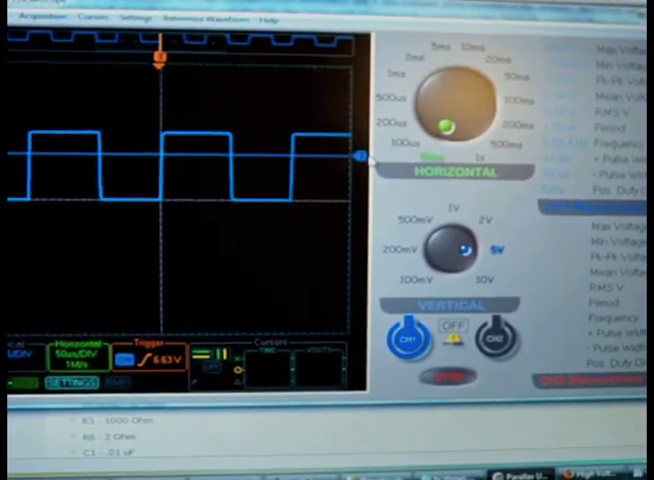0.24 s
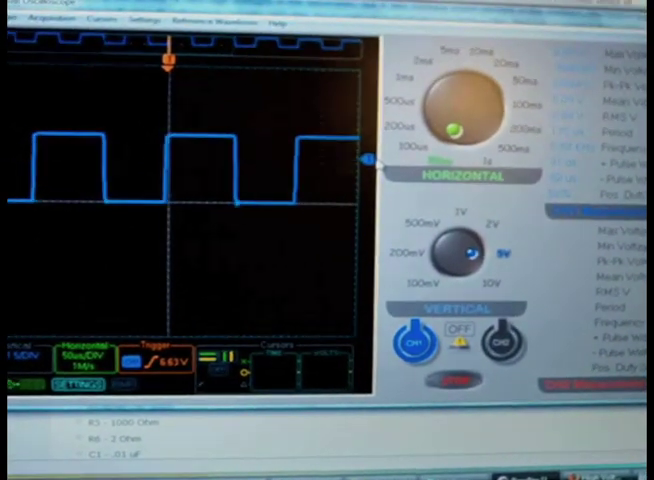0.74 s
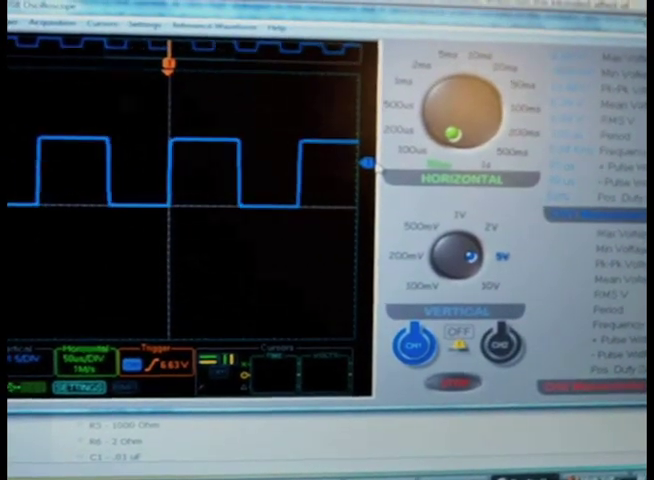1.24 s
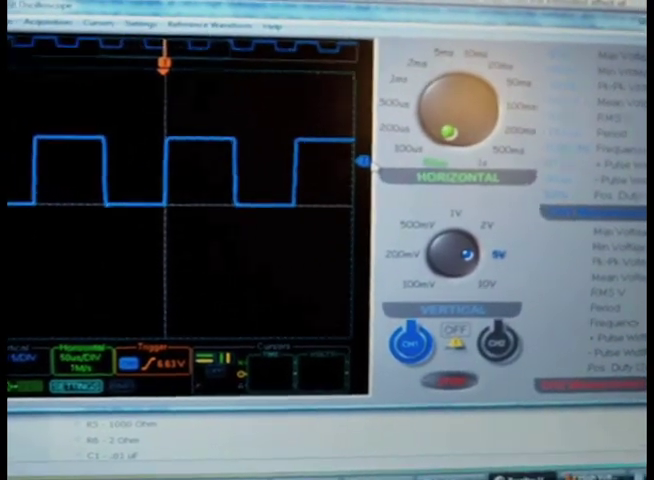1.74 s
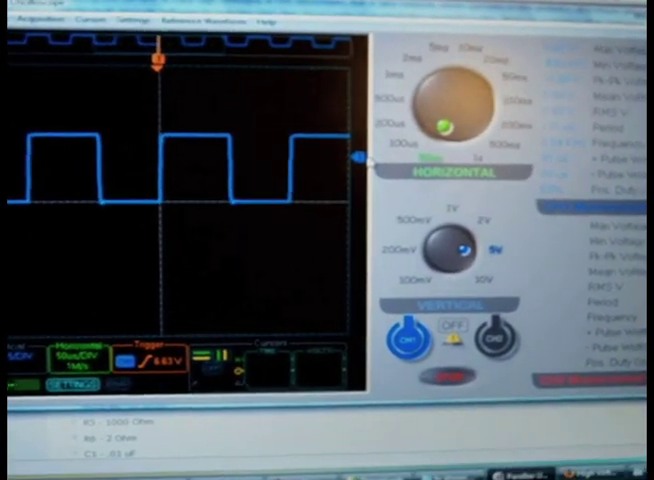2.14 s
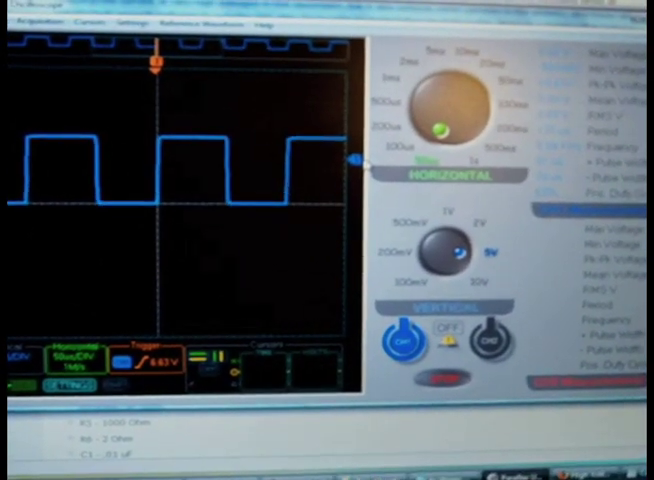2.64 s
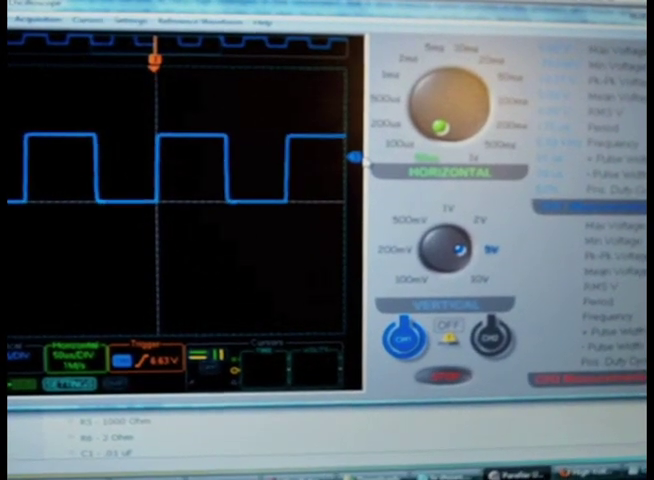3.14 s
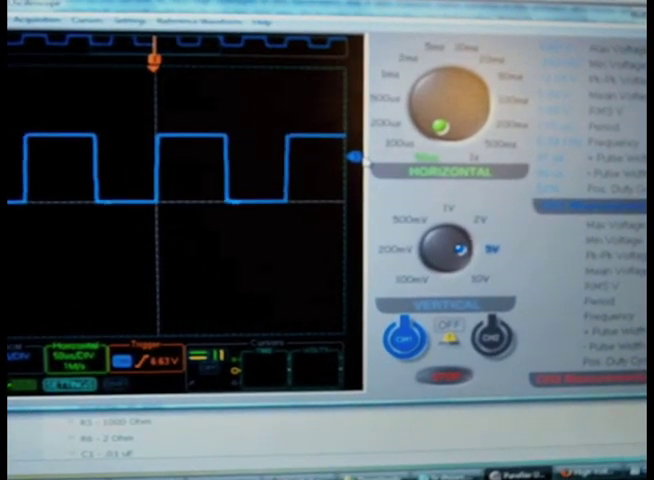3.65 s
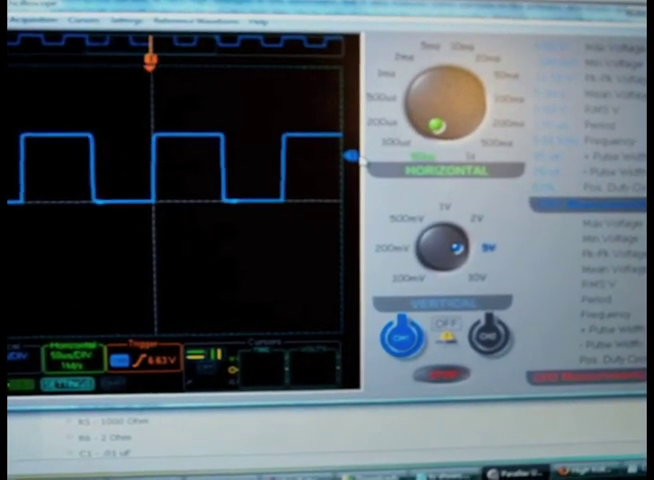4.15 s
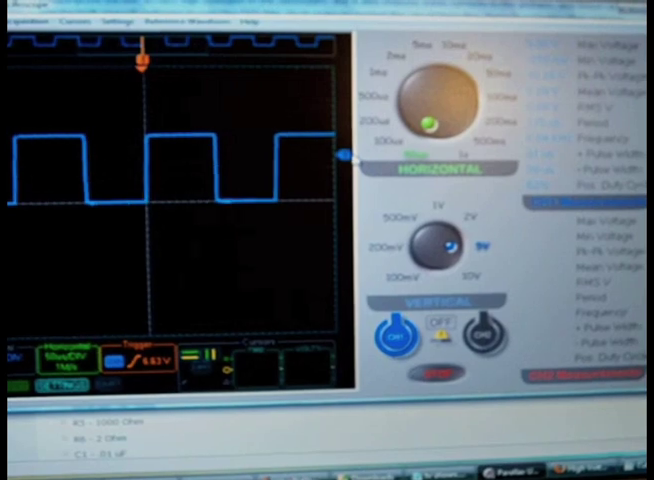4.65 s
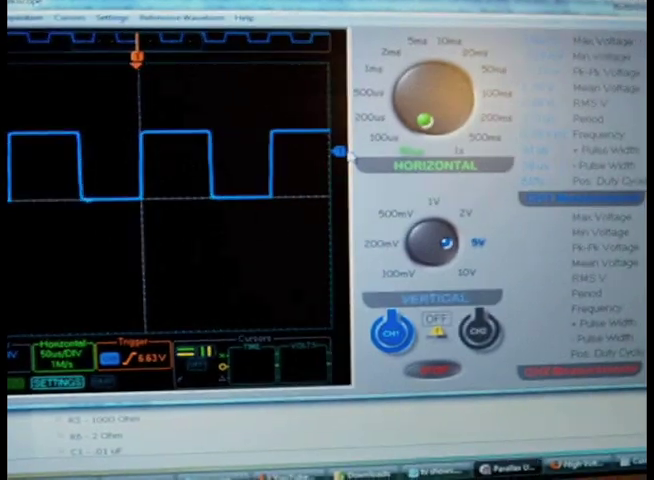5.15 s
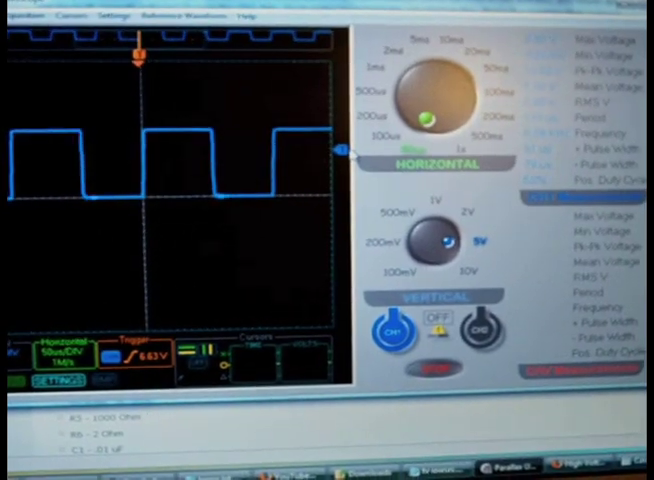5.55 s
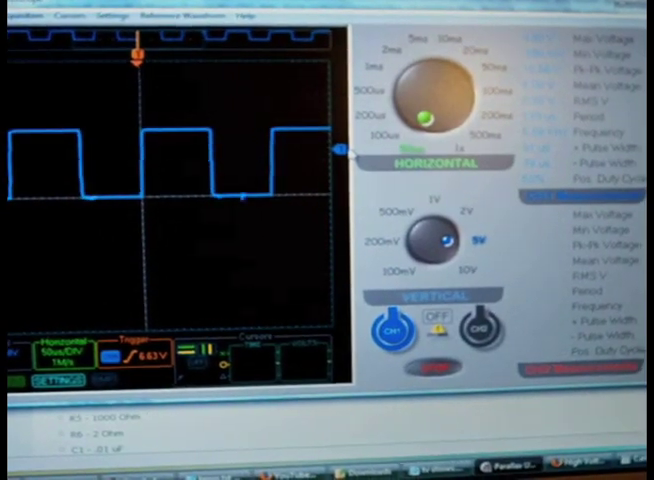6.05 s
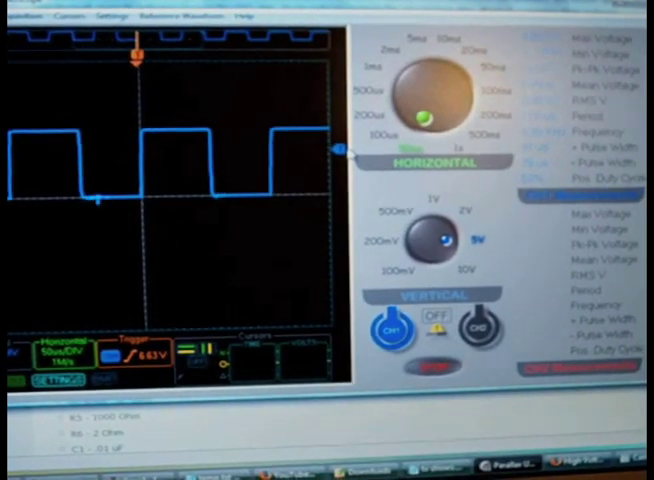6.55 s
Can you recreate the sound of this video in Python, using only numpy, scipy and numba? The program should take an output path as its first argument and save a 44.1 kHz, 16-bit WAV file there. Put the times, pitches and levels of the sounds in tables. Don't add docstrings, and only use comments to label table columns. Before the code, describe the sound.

In a small workshop, a high-voltage circuit sings with a thin, very high whine over mains hum, fans and low rumble. Brief faint spark catches and dull wooden taps come first, then a growing raspy arc that breaks off, scattered rough crackles, and finally a sustained buzzing arc that shifts pitch to the end. One fairly close mono microphone, dull on top, with short room ringing.

```python
import sys
import numpy as np
from scipy import signal
from scipy.fft import rfft, irfft
from scipy.io import wavfile
from scipy.ndimage import uniform_filter1d, map_coordinates
from numba import njit

SR = 44100
rng = np.random.default_rng(int(sys.argv[2]) if len(sys.argv) > 2 else 0)


def unload_audio(sound):
    columns = np.transpose(np.atleast_2d(sound))
    steps = np.round(np.clip(columns, -1, 1) * 32767)
    wavfile.write(sys.argv[1], SR, steps.astype(np.int16))


def boost_factor(decibels):
    exponent = np.asarray(decibels, float) / 20
    return 10 ** exponent


N = 299557

DRIVER_HZ = 5875
ATTACK_S = 0.0027
# (start [s], length [s], level [dB], kind of gap)
CATCHES = [(0.39, 0.061, -52, "hiss"), (0.471, 0.049, -49.5, "hiss"), (.962, 0.018, -53.5, "hiss"),
           (1.123, .008, -43.5, "half"), (1.131, 0.0092, -40.5, "snap"), (1.141, 0.037, -48, "half"),
           (1.167, 0.035, -42.5, "third"), (1.199, 0.047, -40, "third"), (1.261, .015, -41, "half"),
           (1.267, .05, -46.5, "third"), (1.38, 0.016, -39.5, "third"), (1.399, 0.02, -43.5, "half"),
           (1.423, 0.015, -45.5, "third"), (2.137, 0.034, -42.5, "snap"), (2.284, .006, -61, "hiss"),
           (2.328, 0.0066, -41.5, "hiss"), (2.598, .015, -40, "half"), (2.62, 0.0036, -36, "third"),
           (2.623, 0.03, -43, "half"), (3.436, .04, -38.5, "open"), (3.471, 0.036, -38, "open"),
           (3.595, .03, -44, "wide"), (4.254, 0.008, -34.5, "wide"), (4.277, .07, -33.5, "wide"),
           (4.412, .035, -37.5, "wide"), (4.475, 0.049, -34, "wide"), (4.544, .11, -34, "wide"),
           (4.676, 0.27, -50, "wide"), (4.964, 0.013, -40.5, "open"), (5.117, .021, -41, "open")]


def unit(x):
    return x / np.sqrt(np.mean(x ** 2) + 1e-20)


def along(points, hz):
    f, v = np.transpose(points)
    return np.interp(np.log(hz + 1), np.log(f + 1), v)


def curve(rows, t, off=None):
    s, *cols = np.transpose(rows)
    return [np.interp(t, s, c, off, off) for c in cols]


def wobble(rate):
    knots = rng.standard_normal(int(N * rate / SR) + 4)
    return map_coordinates(knots, [np.arange(N) * rate / SR])


def coloured(x, spectrum):
    level_db = np.maximum(along(spectrum, np.fft.rfftfreq(4096, 1 / SR)), -70)
    cepstrum = irfft(np.log(boost_factor(level_db)))
    cepstrum[1:2048] *= 2
    cepstrum[2049:] = 0
    response = irfft(np.exp(rfft(cepstrum)))
    return signal.fftconvolve(x, response)[:N]


def tones(rows):
    t = np.arange(N) / SR
    total = 0
    for hz, db, wander in rows:
        level = boost_factor(db + 2.5 + wander * wobble(6))
        total = total + level * np.sin(2 * np.pi * hz * t + 0.88 * wobble(4.3))
    return total


def background():
    # (frequency [Hz], density [dB per Hz])
    fan_spectrum = [(88, -34.5), (150, -16), (244, -5), (267, -8), (367, -10.5), (433, -12.5), (952, -7),
                    (1040, -14), (1550, -5.5), (3890, -19.5), (5600, -20), (7280, -46.5), (12300, -120)]
    rumble_spectrum = [(8.8, -29), (15, -16), (26, -25.5), (48, -22), (131, -29.5), (200, -35.5),
                       (260, -59), (440, -120)]
    # (frequency [Hz], level re the first [dB], wander [dB])
    hum = [(60, 0, 1), (120, -4, 1.2), (242, -11, 1.2)]
    # (frequency [Hz], rms level [dB], wander [dB])
    fan_tones = [(985, -72, 2), (1513, -73, 1.5), (1763, -75, 2), (1856, -78, 1)]
    # (time [s], gain [dB])
    nearness = [(0, -0.5), (1.5, 0.5), (3.6, 0), (4.0, 6), (4.4, 5), (5.1, 4.5), (5.5, -2), (5.85, 6.5),
                (6.25, 6.5), (6.8, 7.5)]
    near_db, = curve(nearness, np.arange(N) / SR)
    fan_spectrum = fan_spectrum[:-2] + [(6300, -21), (7000, -31.5), (7600, -70)]
    fans = boost_factor(-60 + 0.25 * wobble(14)) * unit(coloured(rng.standard_normal(N), fan_spectrum))
    rumble = boost_factor(-64 + 1.1 * wobble(3.3)) * unit(coloured(rng.standard_normal(N), rumble_spectrum))
    equipment = boost_factor(near_db) * (boost_factor(-66) * tones(hum) + rumble)
    return equipment + boost_factor(0.95 * near_db) * (tones(fan_tones) + fans)


def groans():
    # (time [s], frequency [Hz], level [dB], half length [s])
    swells = [
        (.14, 42.5, -53, 0.081),
        (3.59, 297, -58, 0.021),
        (4.62, 330, -57.5, 0.043),
    ]
    t = np.arange(N) / SR
    return sum(boost_factor(db) * np.exp(-((t - s) / half) ** 2) * np.sin(2 * np.pi * hz * t)
               for s, hz, db, half in swells)


def taps():
    # (time [s], peak level [dB])
    knocks = [(0.335, -41), (0.652, -39), (1.3822, -36.5), (1.6999, -38), (4.988, -34.5)]
    # (frequency [Hz], density [dB per Hz])
    wood_spectrum = [(600, -25.5), (1100, 11), (1600, 4), (2500, 3.5), (3300, -17), (4500, -49)]
    x, t = np.zeros(N + SR), np.arange(2000) / SR
    for s, db in knocks:
        decay = boost_factor(db + 2 - 60 * t / 0.022)
        x[round(s * SR):][:len(t)] += decay * rng.standard_normal(len(t))
    return coloured(x[:N], wood_spectrum)


def opening(t):
    kinds = {"half": (2, .12), "third": (3, .29), "hiss": (2.5, 2), "snap": (3.5, 1.5), "open": (6.5, 2),
             "wide": (12, 2.8)}
    # (time [s], cycles per spark [cycles], scatter [cycles])
    strokes = [
        [(3.64, 8, 1.1), (3.71, 7.2, .9), (3.77, 5.1, .55), (3.86, 5.8, .6), (3.94, 6.9, .55), (4.0, 8, .45),
         (4.045, 8.4, .35), (4.07, 10, 2.2), (4.24, 12, 2.8)],
        [(5.15, 7, 2.4), (5.5, 7, 2.2), (5.6, 7.3, 1.2), (5.68, 5.6, .9), (5.75, 4.25, .42), (5.85, 4, .27),
         (5.89, 3.65, .3), (5.92, 3.1, .25)],
        [(5.92, 3.1, .27), (6.01, 3.1, .28), (6.05, 3.3, .33), (6.12, 3.15, .3), (6.17, 3.9, .4),
         (6.38, 4.9, .7), (6.53, 4, .29), (6.66, 3.3, .3), (6.8, 3.05, .26)],
    ]
    latest = np.maximum(np.searchsorted([row[0] for row in CATCHES], t + ATTACK_S) - 1, 0)
    gap = np.transpose([kinds[row[-1]] for row in CATCHES])[:, latest]
    for stroke in strokes:
        gap = np.where((t >= stroke[0][0]) & (t < stroke[-1][0]), curve(stroke, t), gap)
    return gap


def sparking(t):
    # (time [s], level [dB])
    drawn = [
        [(3.642, -51.5), (3.65, -39.5), (3.85, -33.5), (4.03, -30), (4.041, -39.5), (4.16, -32), (4.19, -48),
         (4.23, -59)],
        [(5.148, -50), (5.158, -37), (5.19, -40.5), (5.6, -36.5), (5.73, -31), (5.86, -32.5), (5.97, -33.5),
         (6.1, -31), (6.8, -32.5)],
    ]
    sag_db_per_s, release_s = 33, 0.022
    shapes = []
    for s, lit, db, _ in CATCHES:
        end_db = db - sag_db_per_s * lit
        shapes.append([(s - ATTACK_S, db - 30.5), (s, db),
                       (s + lit, end_db), (s + lit + release_s, end_db - 39.5)])
    return boost_factor(np.max([curve(shape, t, -200)[0] for shape in shapes + drawn], axis=0))


def whine():
    # (time [s], level [dB])
    singing = [(0, -42.5), (.3, -43), (.7, -42), (.9, -42.5), (1.1, -47.5), (1.3, -41.5), (1.5, -43.5),
               (1.7, -36.5), (1.9, -36.5), (2.05, -43.5), (2.55, -39.5), (3.1, -42.5), (3.46, -39.5),
               (3.7, -44.5), (4.0, -36.5), (4.95, -36), (5.2, -50.5), (6.79, -36)]
    # (time [s], depth [dB], t60 [s])
    stutters = [(.215, -56, .5), (.44, -54, .3), (.79, -56, .5), (1.26, -54, .3), (2.5, -62, .5),
                (2.8, -64, .3)]
    # (time [s], change [dB], half length [s])
    shadows = [(.265, -23, 0.016), (0.444, 7, 0.012), (.52, -27, 0.013), (.69, 3.5, 0.037),
               (.855, -7.5, 0.073), (0.91, 5, .04), (1.18, -7.5, 0.029), (1.24, -27, .012),
               (1.281, 7, 0.019), (1.45, -9, 0.022), (1.58, -9, 0.033), (2.1, 4, .04), (2.23, -10.5, 0.074),
               (2.38, -21, 0.076), (4.07, -21, 0.056), (4.18, -14.5, 0.035), (4.57, -11, .06),
               (4.72, -5.5, 0.3), (5.45, -12, 0.057), (5.575, 10, .015), (5.64, -15, 0.033),
               (5.71, 14, .015), (5.9, 12.5, 0.055), (6.12, 16.5, 0.0088), (6.18, -10, 0.013),
               (6.63, -14.5, 0.075)]
    flutter_spectrum = [(30, -8.5), (110, -9.5), (200, -14.0), (600, -15.5), (1000, -44.5)]
    t = np.arange(N) / SR
    burning = sparking(t)
    rough = sum(boost_factor(db - 60 * np.abs(t - s) / t60) * (t > s) for s, db, t60 in stutters)
    rough = rough + boost_factor(-10) * burning
    flutter = unit(coloured(rng.standard_normal(N), flutter_spectrum))
    shadow_db = sum(db * np.maximum(1 - np.abs(t - s) / (2 * half), 0) ** 2 for s, db, half in shadows)
    steady = boost_factor(curve(singing, t)[0] + shadow_db + 0.18 * wobble(60))
    steady = np.maximum(steady, boost_factor(-55) + boost_factor(-9) * uniform_filter1d(burning, size=2000))
    drift = 0.26 * wobble(36)
    return np.sqrt(2) * (steady + rough * flutter) * np.sin(2 * np.pi * DRIVER_HZ * t + drift)


@njit
def breakdowns(wait):
    out, k = np.zeros(len(wait)), 0
    while k + wait[k] < len(wait):
        out[k + wait[k]] = wait[k]
        k += wait[k]
    return out


def arc(delay_s=1.05e-5, size_db=1.2):
    # (frequency [Hz], density [dB per Hz])
    spark_spectrum = [(300, -16), (520, -12.5), (800, -7), (1600, -8), (1950, -6.5), (2500, -2.5),
                      (3200, -6), (4000, -2), (4600, -1.5), (5500, 2), (6300, -6.5), (6900, 9.5),
                      (7250, 5.5), (7500, -25.5)]
    t = np.arange(int(N / SR * DRIVER_HZ)) / DRIVER_HZ
    gap, scatter = opening(t)
    luck = rng.standard_normal((4, len(t)))
    warmth = unit(uniform_filter1d(luck[3], size=60))
    wait = gap + scatter * (.9 * luck[0] + .45 * warmth)
    charge = breakdowns(np.maximum(np.round(wait), 1).astype(np.int64))
    charge = charge * boost_factor(size_db * luck[1]) - 1
    flicker = boost_factor(2 * wobble(45)[(t * SR).astype(int)])
    level = sparking(t)
    size = level * flicker * charge / np.sqrt(gap - .8)
    late = delay_s * np.clip(gap - 1.3, .5, 2.8) * luck[2]
    at = (t + late) * SR + 8
    places = np.floor(at)[:, None] + np.arange(-7, 9)
    offset = places - at[:, None]
    pulses = size[:, None] * np.sinc(offset) * np.cos(np.pi * offset / 16) ** 2
    train = np.bincount(np.maximum(places, 0).astype(int).ravel(), pulses.ravel(), N + 32)
    crack = boost_factor(13) * coloured(train[8:N + 8], spark_spectrum)
    thin = .65 / (1 + (np.interp(np.arange(N) / SR, t, level) / boost_factor(-44)) ** 2)
    crack = crack - thin * uniform_filter1d(crack, size=9)
    return crack + boost_factor(-7) * np.roll(crack, 27)


def room(x):
    # (frequency [Hz], t60 [s])
    decay = [(500, 0.58), (3000, 0.44), (7000, 0.47)]
    hz, t, z = signal.stft(rng.standard_normal(SR // 2), SR, nperseg=256)
    dying = z * boost_factor(-60 * t / along(decay, hz)[:, None])
    tail = signal.istft(dying, SR, nperseg=256)[1]
    return signal.fftconvolve(np.pad(x, (130, 0)), tail / np.linalg.norm(tail))[:N]


def scene():
    sparks, knocks = arc(), taps()
    reverberant = room(boost_factor(-1.5) * sparks + boost_factor(-9) * knocks)
    mono = sparks + knocks + reverberant + whine() + background() + groans()
    return np.array([mono, mono])


def low_pass(x):
    return signal.sosfilt(signal.butter(12, 7760, fs=SR, output="sos"), x)


def record(dry):
    edge = signal.cheby2(10, 60, 8100, fs=SR, output="sos")
    mix = signal.sosfilt(edge, dry) - .0039
    return low_pass(mix)


dry = scene()
out = record(dry)
unload_audio(out)
```